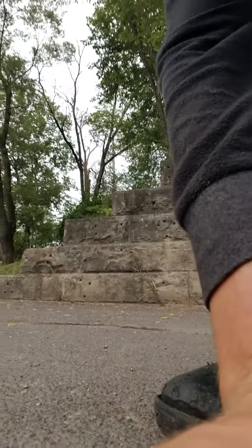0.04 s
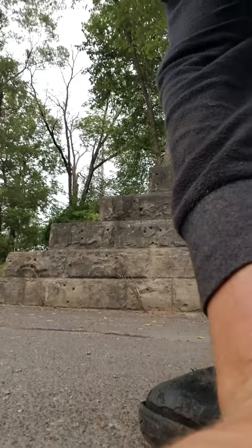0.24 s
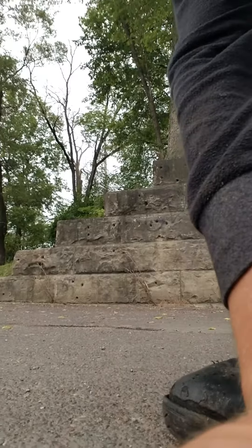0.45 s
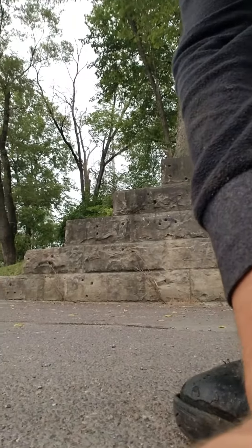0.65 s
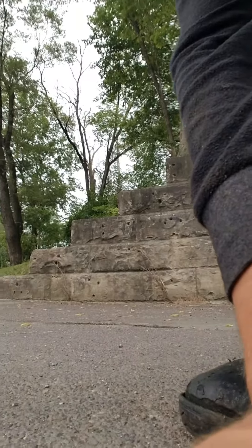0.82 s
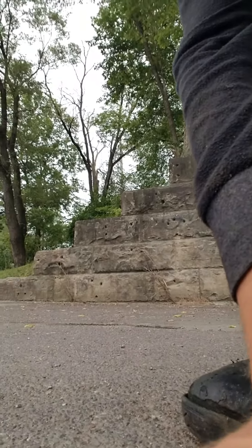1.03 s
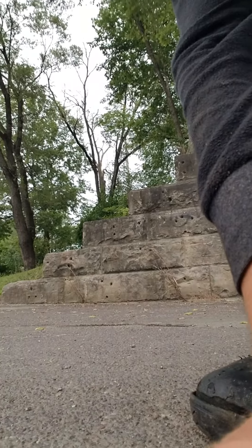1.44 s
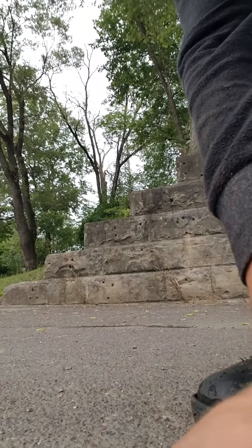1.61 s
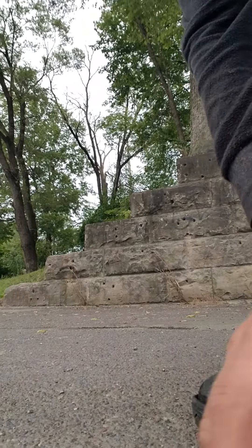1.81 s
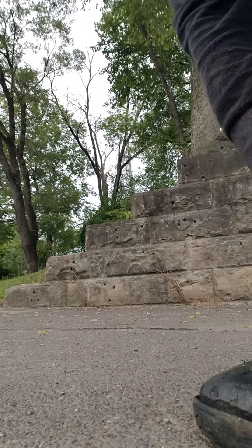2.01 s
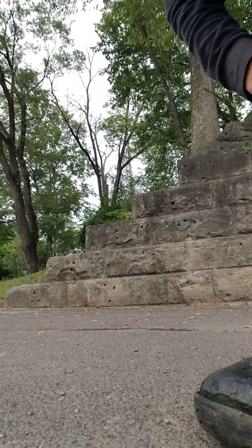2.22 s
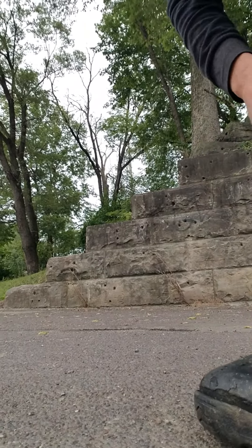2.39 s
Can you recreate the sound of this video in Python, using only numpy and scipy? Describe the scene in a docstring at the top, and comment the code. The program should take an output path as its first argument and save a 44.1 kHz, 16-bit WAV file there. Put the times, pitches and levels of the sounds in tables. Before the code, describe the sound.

Camera handling noise comes first, very close: hollow knocks, clicks and a brief squeak of skin. Then a sleeve swishes softly, faint birds chirp among park trees, and a gritty scuff on the pavement ends in a double knock.

```python
"""Over the soft air of a park, a hand steadies a small camera on the pavement: fingers bump, tap and
rub the hollow case, which knocks, rings and shudders. The case snaps once, and the hand slides off
with a dull squeak of sticking, slipping skin. Then a sleeve brushes by while faint birds whistle
in glides that echo from the trees. Near the end something scuffs on the asphalt, dragging grit
into a double knock."""
import sys
import numpy as np
from scipy import signal
from scipy.fft import rfft, irfft
from scipy.io import wavfile
from scipy.ndimage import uniform_filter1d

SR = 44100
rng = np.random.default_rng(int(sys.argv[2]) if len(sys.argv) > 2 else 0)


def generate_wav(signal):
    """Clip the signal to [-1, 1] and save it as 16-bit WAV at the path in sys.argv[1]."""
    frames = np.transpose(np.atleast_2d(signal))
    scaled = np.clip(frames, -1, 1) * 32767
    pcm = np.round(scaled).astype(np.int16)
    wavfile.write(sys.argv[1], SR, pcm)


N = 112454
T = np.arange(N) / SR


def amp(db):
    """Decibels to gain."""
    return 10 ** (np.asarray(db) / 20)


def unit(x):
    """Scales to rms 1."""
    return x / np.sqrt(np.mean(x ** 2) + 1e-20)


def sides(pan_db):
    """Equal-power pan gains; positive is left."""
    gains = amp([[pan_db / 2], [-pan_db / 2]])
    return gains / np.sqrt(np.mean(gains ** 2))


def since(s):
    """Time since s, zero before."""
    return np.maximum(T - s, 0)


def ring(t, hz, t60, rise_s=0.00028, phase=0):
    """One struck mode with a soft attack."""
    attack = np.expm1(-2 * t / rise_s) ** 2
    return attack * amp(-60 * t / t60) * np.sin(2 * np.pi * hz * t + phase)


def add(mix, s, sound):
    """Mixes a stereo sound in at time s."""
    part = mix[:, max(round(s * SR), 0):][:, :sound.shape[1]]
    part += sound[:, :part.shape[1]]


def impulse(colour, size=4096):
    """Minimum-phase click with the given EQ curve, peak 1."""
    hz, db = np.transpose(colour)
    bins_hz = abs(np.fft.fftfreq(size, 1 / SR))
    log_gain = np.log(amp(np.interp(np.log(bins_hz + 1), np.log(hz + 1), db)))
    click = np.fft.ifft(np.exp(np.conj(signal.hilbert(log_gain)))).real[:size // 2]
    return click / abs(click).max()


def left_first(click, lag_s):
    """Stereo click that reaches the right microphone late."""
    t = T[:len(click)]
    return np.array([click, np.interp(t - lag_s, t, click, left=0)])


def through(x, response):
    """Filters both channels, keeping the power of white noise."""
    norm = np.sqrt(np.sum(response ** 2, -1, keepdims=True))
    return signal.fftconvolve(x, np.atleast_2d(response) / norm, axes=1)[:, :N]


def pair(noise, likeness):
    """Narrows the stereo image of two independent channels."""
    return np.array([noise[0], likeness * noise[0] + np.sqrt(1 - likeness ** 2) * noise[1]])


def wander(hz):
    """Smooth random modulation of rms 1, rolling off above hz."""
    bins_hz = np.fft.rfftfreq(N, 1 / SR)
    return unit(irfft(rfft(rng.standard_normal(N)) / (1 + (bins_hz / hz) ** 4), N))


def swells(strokes):
    """Stereo envelope of bell-shaped strokes."""
    return np.sqrt(sum((amp(db) * sides(pan)) ** 2 * np.exp(-np.minimum(((T - s) / half) ** 2, 60))
                       for s, half, db, pan in strokes))


def glide(points):
    """Smooth pitch and gain along (time, pitch, level) points, silent outside them."""
    s, hz, db = np.transpose(points)
    gain = amp(np.interp(T, s, db)) * (T > s[0]) * (T < s[-1])
    return uniform_filter1d(np.interp(T, s, hz), size=300), uniform_filter1d(gain, size=200)


def tone(hz):
    """A sine of rms 1 that follows a pitch curve."""
    return np.sqrt(2) * np.sin(2 * np.pi * np.cumsum(hz) / SR)


def hiss(envelope, colour):
    """Wide, smooth noise shaped by an EQ curve."""
    return envelope * through(pair(rng.standard_normal((2, N)), likeness=0.2), impulse(colour))


def friction(strokes, colour, likeness, left_lag_s=0, grains_per_s=5000, spread_db=2.5, clump_db=2):
    """Clumps of tiny slips under each stroke, coloured by what they shake."""
    slips = rng.standard_normal((2, N)) * (rng.random((2, N)) < grains_per_s / SR)
    slips *= amp(spread_db * np.minimum(rng.exponential(1, (2, N)), 3))
    slips *= amp(clump_db * wander(hz=297))
    left, right = through(pair(unit(slips), likeness) * swells(strokes), impulse(colour))
    return np.array([np.roll(left, round(left_lag_s * SR)), right])


# EQ of the air bed (frequency [Hz], level [dB])
AIR_EQ = [(15, -77), (25, -24), (66, -10.5), (165, -6), (212, -9), (354, -8), (430, -12), (607, -12.5),
          (887, -9.5), (1330, -15.5), (2350, -25), (2910, -16), (3820, -22), (4870, -34), (9570, -40),
          (16000, -35)]
# its fader ride (time [s], level [dB])
AIR_FADER = [(0, -94), (.05, -56), (.3, -45.5), (.8, -47.5), (1.1, -52), (1.6, -52), (2.1, -48),
             (2.55, -51.5)]


def park_air():
    """A dark bed of outdoor air that fades in and gently swells."""
    return hiss(amp(np.interp(T, *np.transpose(AIR_FADER))), AIR_EQ)


# swell of the far call (centre [s], half length [s], level [dB], pan [dB])
FAR_SWELL = [(1.44, 0.17, -55, 3)]
# its EQ (frequency [Hz], level [dB])
FAR_EQ = [(1500, -51), (2550, -0.5), (2900, -3.5), (3500, -2), (4000, -25), (6000, -26)]


def far_bird():
    """A distant call, blurred into a band of noise."""
    return hiss(swells(FAR_SWELL), FAR_EQ)


# raspy opening note (time [s], pitch [Hz], level [dB])
OPENING_NOTE = [(1.33, 2600, -69), (1.4, 2800, -54.5), (1.46, 2956, -54.5), (1.525, 2755, -50.5),
                (1.55, 2650, -55)]
# its stacked strands (offset above the note [Hz], level [dB])
NOTE_STRANDS = [(0, 1), (250, -4.5), (450, -9), (730, -6.5)]
# one glide per whistle, each a list of (time [s], pitch [Hz], level [dB])
WHISTLE_GLIDES = [
    [(1.525, 3300, -68), (1.539, 2870, -39.5), (1.55, 2255, -49.5), (1.564, 1430, -72)],
    [(1.6, 1608, -65), (1.628, 2746, -43), (1.65, 4140, -57), (1.68, 5500, -75), (1.715, 6700, -78),
     (1.77, 7630, -65), (1.81, 7100, -76)],
    [(1.675, 3744, -64), (1.703, 2945, -47), (1.74, 2050, -57), (1.78, 1753, -59), (1.797, 1946, -57),
     (1.81, 2940, -46)],
    [(1.675, 1804, -69), (1.7, 2976, -44.5)],
    [(1.85, 4700, -68), (1.87, 3550, -50.5), (1.884, 2700, -39), (1.9, 2026, -51), (1.925, 1630, -58)],
    [(2.03, 1750, -64), (2.06, 2320, -49), (2.09, 2770, -39), (2.11, 3640, -54), (2.13, 4680, -66),
     (2.165, 7200, -79)],
    [(2.35, 10600, -81), (2.385, 10500, -64), (2.44, 10400, -64), (2.5, 10540, -71)],
]
# rasp on the first chirp (centre [s], half length [s], level [dB], pan [dB])
CHIRP_RASP = [(1.537, 0.018, -49, 0)]
# its EQ (frequency [Hz], level [dB])
CHIRP_EQ = [(2500, -37), (3600, 6.5), (4200, -2), (4800, -5), (5600, -42)]


def birds(drift=0.013, jitter=0.01405, flutter_hz=148, flutter_db=2, echo_db=-5.5, echo_t60_s=1):
    """A many-stranded note, then fluttering, gliding whistles with an echo from the trees."""
    hz, gain = glide(OPENING_NOTE)
    song = gain * sum(amp(db) * tone((hz + offset) * (1 + drift * wander(hz=24.9)))
                      for offset, db in NOTE_STRANDS)
    for whistle in WHISTLE_GLIDES:
        hz, gain = glide(whistle)
        song += gain * tone(hz * (1 + jitter * wander(flutter_hz)))
    direct = sides(pan_db=-5.5) * song * amp(flutter_db * wander(flutter_hz))
    trees = rng.standard_normal((2, SR)) * amp(-60 * T[:SR] / echo_t60_s)
    trees *= T[:SR] > 0.0092  # pre-delay
    return direct + amp(echo_db) * through(direct, trees) + hiss(swells(CHIRP_RASP), CHIRP_EQ)


# cloth swishes and crackling folds (centre [s], half length [s], level [dB], pan [dB])
SLEEVE_SWISHES = [(1.32, 0.041, -58, -16), (1.5, 0.08, -56, -6), (1.8, 0.095, -52.5, -3),
                  (1.95, 0.12, -54, -4.5), (2.38, 0.11, -53.5, -3)]
SLEEVE_FOLDS = [(1.297, 0.017, -52.5, -9), (1.352, 0.0092, -52, -11), (1.853, .003, -45, -5)]
# cloth EQ (frequency [Hz], level [dB])
CLOTH_EQ = [(800, 7), (3000, 4.5), (5500, -1), (9000, -6), (13500, -0.5), (16000, 0)]


def sleeve():
    """Cloth brushes by with a soft hiss, and its folds crackle."""
    swish = hiss(swells(SLEEVE_SWISHES), CLOTH_EQ)
    return swish + friction(SLEEVE_FOLDS, CLOTH_EQ, likeness=0.1, grains_per_s=720)


# knocks within the scuff (time [s], level [dB])
SCUFF_HITS = [(2.189, -27), (2.2064, -17.5), (2.2136, -26), (2.2304, -22), (2.2366, -19.5), (2.2467, -3.5),
              (2.2503, -19), (2.2518, -3)]
# grit dragged around them (centre [s], half length [s], level [dB], pan [dB])
GRIT_DRAGS = [(2.205, 0.017, -43.5, -2), (2.2385, 0.0097, -25.5, -2.5), (2.2525, 0.0033, -23, 1),
              (2.278, 0.0067, -39.5, -4), (2.335, 0.012, -47.5, -5.5)]
# EQs of knock and grit (frequency [Hz], level [dB])
KNOCK_EQ = [(59, -32), (100, -7), (170, -16), (492, 5), (648, 4.5), (991, -3), (1830, 0), (2370, -14),
            (3400, -14.5), (3620, -20), (4770, -22), (5900, -27), (6990, -47), (10200, -29), (16000, -47)]
GRIT_EQ = [(88, -42), (150, -32), (275, -10.5), (888, -5), (1240, -3.5), (1690, 2), (2400, -16),
           (4410, -19.5), (9440, -27.5), (15100, -26), (16000, -34)]


def scuff():
    """Grit drags and catches on the asphalt, peaking in a double knock."""
    out = np.zeros((2, N))
    knock = sides(pan_db=-4) * left_first(impulse(KNOCK_EQ), lag_s=0.00015)
    for s, db in SCUFF_HITS:
        add(out, s, amp(db) * knock)
    return out + friction(GRIT_DRAGS, GRIT_EQ, likeness=0.18, left_lag_s=0.00035)


# skin strokes on the case (centre [s], half length [s], level [dB], pan [dB])
SKIN_STROKES = [(.1315, 0.0014, -45.5, 1.5), (.167, .001, -49, 4), (.1952, 0.00063, -37.5, -8),
                (.213, 0.014, -51, -8), (.239, 0.0031, -31.5, -10), (.252, 0.0035, -32, -20),
                (.259, 0.0016, -37, 8), (.2885, 0.0069, -33.5, 3), (.2938, 0.0028, -26.5, -6),
                (.307, 0.0071, -35.5, -16), (.346, 0.0023, -27, -5), (.3542, 0.0023, -23, -4.5),
                (.478, 0.0011, -38, -20), (.497, 0.01, -48.5, -6), (.5292, 0.0018, -33.5, -17),
                (.5383, 0.00057, -27, -12), (.5435, .005, -35.5, -3), (.551, 0.0012, -27.5, -1),
                (.569, 0.003, -30.5, -12), (.58, 0.013, -39, -8), (.5868, 0.00039, -14.5, 1),
                (.5977, .001, -39.5, 0), (.6675, 0.0012, -45, -18), (.673, 0.00081, -46.5, -16),
                (.8715, 0.00092, -43, -1), (.912, 0.009, -40, -6), (.934, 0.005, -43.5, -6)]
# their EQ (frequency [Hz], level [dB])
SKIN_EQ = [(530, -48.5), (900, -8), (1700, -11.5), (2960, -3.5), (3910, -23.5), (4800, -15), (5960, -23.5),
           (8980, -11.5), (10800, -17), (15100, -12.5), (16000, -47)]


def skin_rub(ticks_per_s=35, ticks_db=-66, hold_s=(0.041, 0.82), low_cut_hz=890):
    """Skin rasps brightly over the case, with tiny stray ticks while the hand holds it."""
    ticks = rng.standard_normal((2, N)) * (rng.random(N) < ticks_per_s / SR)
    holding = (T > hold_s[0]) * (T < hold_s[1])
    stray = amp(ticks_db) * through(unit(ticks) * holding, impulse(SKIN_EQ))
    rasp = friction(SKIN_STROKES, SKIN_EQ, likeness=0.09, grains_per_s=4000)
    return signal.sosfilt(signal.butter(2, low_cut_hz, "high", fs=SR, output="sos"), rasp + stray)


# swells of handling rumble (centre [s], half length [s], level [dB], pan [dB])
SHUDDER_SWELLS = [(.14, 0.077, -51, -5), (.246, 0.015, -21, 1.5), (.308, 0.016, -22.5, -9),
                  (.352, 0.014, -29.5, -6), (.39, 0.033, -39.5, -1), (.48, 0.024, -48.5, 2),
                  (.562, 0.019, -25, 2.5), (.70, 0.046, -41, 1.5)]
# their bass-heavy EQ (frequency [Hz], level [dB])
SHUDDER_EQ = [(20, -21), (45, -17), (90, -2), (170, 1), (280, -4.5), (450, -12), (800, -17.5),
              (1500, -25.5), (4000, -50)]


def case_shudder():
    """The case shudders under the sliding hand."""
    return friction(SHUDDER_SWELLS, SHUDDER_EQ, likeness=0.33)


# the parting stroke (centre [s], half length [s], level [dB], pan [dB])
SLIDE_STROKE = [(.912, 0.027, -31, -6.5)]
# its muffled EQ (frequency [Hz], level [dB])
SLIDE_EQ = [(100, -39), (280, -10), (420, 1.5), (580, -4), (750, -10), (1250, -8), (1800, -22), (4000, -41)]


def hand_slide():
    """Dull friction as the hand slides off."""
    return friction(SLIDE_STROKE, SLIDE_EQ, likeness=0.43, left_lag_s=0.00035)


# squeak of a finger sliding off (time [s], pitch [Hz], level [dB])
SQUEAK_GLIDE = [(.879, 413.8, -24.5), (.893, 479.6, -33), (.907, 589.3, -26.5), (.919, 528.5, -40),
                (.93, 483.5, -31.5), (.945, 416, -42), (.965, 367, -47)]


def finger_squeak(jitter=0.0687, rough_hz=203, rough_db=2.5, octave_db=-14, left_lag_s=0.0005):
    """Skin sticks and slips unevenly; its pitch rises and falls with the speed of the finger."""
    hz, gain = glide(SQUEAK_GLIDE)
    hz = hz * (1 + jitter * wander(rough_hz))
    roughness = amp(rough_db * wander(rough_hz))
    squeak = gain * roughness * (tone(hz) + amp(octave_db) * tone(2 * hz))
    return sides(pan_db=-1) * np.array([np.roll(squeak, round(left_lag_s * SR)), squeak])


# hard scrapes (centre [s], half length [s], level [dB], pan [dB])
SCRAPE_STROKES = [(.2375, .002, -43, -10), (.2932, 0.0037, -20, -10), (.354, 0.0016, -37.5, 1)]
# resonances of the hollow case (frequency [Hz], level [dB], t60 [s])
HOLLOW_MODES = [(1400, -5, 0.011), (1646, 7, 0.022), (1800, -6, 0.018), (2660, -12, 0.044),
                (5000, -30, 0.0083)]


def case_scrapes():
    """Hard slips make the hollow case ring."""
    case = sum(amp(db) * ring(T[:SR // 10], hz, t60) for hz, db, t60 in HOLLOW_MODES)
    slips = pair(rng.standard_normal((2, N)), likeness=0.67) * swells(SCRAPE_STROKES)
    return through(slips, case)


# fingernail hits (time [s], level [dB], pan [dB])
NAIL_HITS = [(.1312, -26, 13), (.1952, -28, -9), (.478, -21, -10), (.5505, -17, -11), (0.5864, -4, 3)]
# their EQ (frequency [Hz], level [dB])
NAIL_EQ = [(200, -15), (900, 0), (1800, 0), (3000, -15), (4500, 2.5), (7000, -10.5), (12000, -5.5),
           (16000, -7)]


def nail_taps():
    """Each hard contact of a fingernail gives one bright click."""
    out = np.zeros((2, N))
    click = left_first(impulse(NAIL_EQ), lag_s=0.0003)
    for s, db, pan in NAIL_HITS:
        add(out, s, amp(db) * sides(pan) * click)
    return out


# resonances of the snap (frequency [Hz], level [dB], t60 [s])
SNAP_MODES = [(622, -20, 0.019), (1173, -16, .004), (1790, -3.5, 0.0032), (2280, -29, 0.002),
              (2660, -11, 0.005), (4120, -10.5, 0.0053), (5840, -16, 0.0051), (7420, -10, 0.0031),
              (9180, -7.5, 0.0028), (12020, -3.5, 0.0051), (13300, -0.5, 0.0027), (15700, -14, 0.0043)]


def case_snap(at_s=0.8412, gain_db=1, right_lag_s=0.000388):
    """The case gives one short, bright click; neighbouring modes swing opposite ways."""
    t = np.array([since(at_s), since(at_s + right_lag_s)])
    return amp(gain_db) * sum((-1) ** k * amp(db) * ring(t, hz, t60)
                              for k, (hz, db, t60) in enumerate(SNAP_MODES))


# nudges that rock the camera (time [s], level [dB])
NUDGES = [(0.025, -46.5), (0.059, -35), (0.59, -21)]


def camera_rock():
    """Bumps set the propped camera rocking with a low ring."""
    return sum(amp(db) * sides(pan_db=18.5) * ring(since(s), hz=198, t60=0.25, rise_s=0.0048)
               for s, db in NUDGES)


# finger hits on the case (time [s], level [dB], pitch [Hz], t60 [s], thud re knock [dB],
# crack re knock [dB], pan [dB], left phase lead [rad])
FINGER_HITS = [(0.0229, -28, 580, 0.015, -22, -11.5, 0, 1.67), (.055, -25.5, 500, 0.026, -21, -22, 0, 1.8),
               (0.097, -23.5, 446, 0.024, -11, -25, 3, 1.86), (0.133, -29.5, 520, 0.032, 5.5, -19, 4.5, 4),
               (0.194, -28, 280, 0.068, -17, -21, -3, 3.5), (0.2335, -12, 237, 0.03, -17, -16, -13, 2.5),
               (0.2436, -7.5, 167, 0.037, -21, -24, 13, 2.5), (0.2526, -5.5, 270, 0.0094, -23, -18.5, 2, 4),
               (0.2594, 1, 416, 0.0082, -6, -14, 28, 2.6), (0.299, -15, 151, 0.033, 0, -20, -10, -2),
               (0.309, -10.5, 278, 0.028, -36, -20, -29, 3.5), (0.314, -3, 570, 0.041, -22, -7, 7, -1.4),
               (.3215, -5.5, 598, 0.031, -5, -25, -0.5, 4.5), (0.3473, -16, 144, 0.043, -4, -22, 7, 0.3),
               (0.3627, -21, 352, 0.051, -6, -32, -11, 1.5), (0.3916, -25, 561, 0.046, -7, -18, -4, 2),
               (0.402, -18.5, 285, 0.05, -9, -29, -8, 1.5), (.408, -19, 336, 0.029, -16, -18, -18, 5.5),
               (0.5505, -12.5, 346, 0.029, -3, -7, -1, 1), (.571, -15.5, 221, 0.1, 1, -33, -6, 2),
               (.587, -8, 256, .035, -6, -31, -11, 2.5), (0.5868, 0, 390.4, 0.03, -5.5, -9, 5, 2.5),
               (0.5925, -3.5, 400, 0.041, -8, -22, -7, 3), (0.6812, -21.5, 379, 0.054, -19, -20, -15, 2.5),
               (.6848, -26, 565, .035, -8, -29, -2, 1), (0.7329, -16, 444, 0.011, -10, -10.5, 7, 4.5),
               (0.7585, -29.5, 324, 0.028, -10, -3, -10, 1),
               (0.8531, -19.5, 370, 0.095, -35, -43, -12, 3.5),
               (0.8716, -10.5, 592, 0.039, -31, -10.5, -2.5, -1.36),
               (0.9374, -23, 382.5, 0.054, -27, -31, -1, 1.3),
               (1.0247, -36.5, 1390, 0.017, -16, -13, -10, 1.5),
               (1.322, -44, 383, 0.033, -25.5, -19, -4, -0.5)]
# EQ of the contact crack (frequency [Hz], level [dB])
CRACK_EQ = [(100, -3.5), (600, 5), (1100, 7.5), (1800, -1.5), (3000, -13.5), (6000, -31), (12000, -43),
            (16000, -37)]


def finger_bumps(rise_s=0.00054):
    """Each bump on the case layers a damped knock, a low thud and a contact crack."""
    out = np.zeros((2, N))
    t, crack = T[:SR // 5], impulse(CRACK_EQ)
    for s, db, hz, t60, thud_db, crack_db, pan, lead in FINGER_HITS:
        phase = np.array([[lead / 2], [-lead / 2]])
        gain = amp(db) * sides(pan)
        knock = ring(t, hz, t60, rise_s, phase)
        thud = amp(thud_db) * ring(t, hz=124.2, t60=0.015, rise_s=rise_s, phase=phase)
        add(out, s, gain * (knock + thud))
        add(out, s, gain * amp(crack_db) * crack)
    return out


def scene():
    """Handling noises and the scuff up close, birds and air behind."""
    rubs = skin_rub() + case_shudder() + hand_slide() + sleeve() + case_scrapes() + finger_squeak()
    hits = scuff() + nail_taps() + case_snap() + camera_rock() + finger_bumps()
    background = birds() + far_bird() + park_air()
    return background + rubs + hits


def record(dry, low_cut_hz=56.4, high_cut_hz=16300):
    """The microphones roll off the bass, peaks clip at full scale, and the very top is cut."""
    thinned = signal.sosfilt(signal.butter(1, low_cut_hz, "high", fs=SR, output="sos"), dry)
    high_cut = signal.firwin(255, high_cut_hz, window=("kaiser", 8), fs=SR)
    return signal.oaconvolve(np.clip(thinned, -1, 1), high_cut[None], "same", axes=1)


dry = scene()
out = record(dry)
generate_wav(out)
```